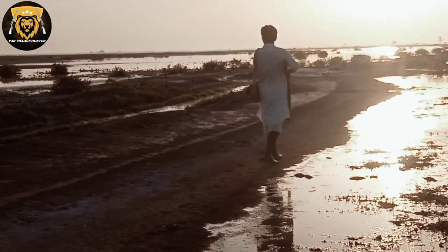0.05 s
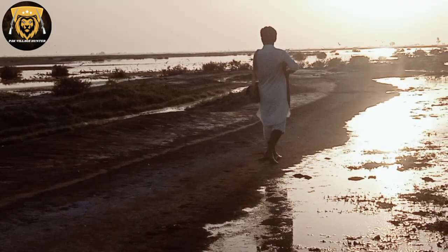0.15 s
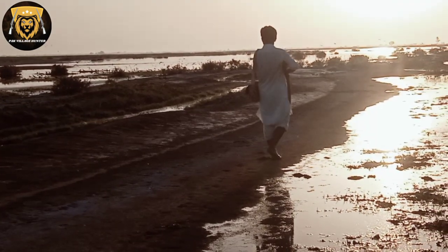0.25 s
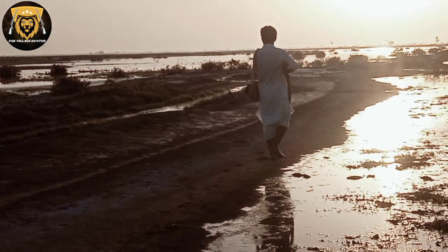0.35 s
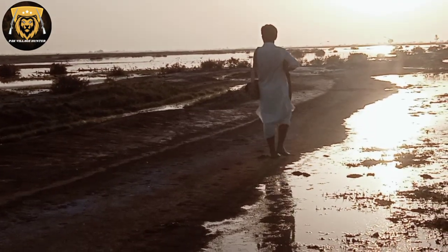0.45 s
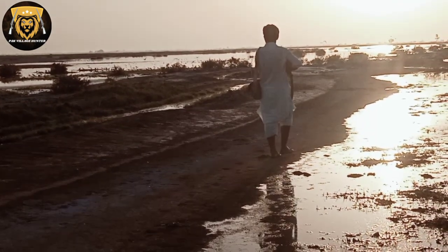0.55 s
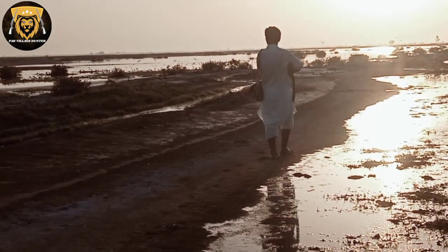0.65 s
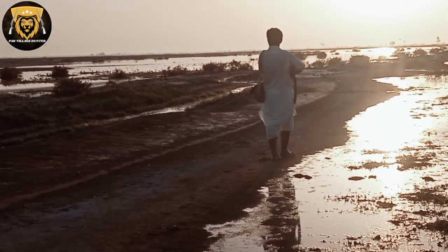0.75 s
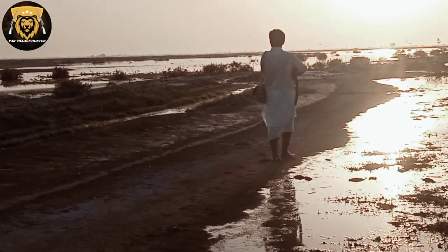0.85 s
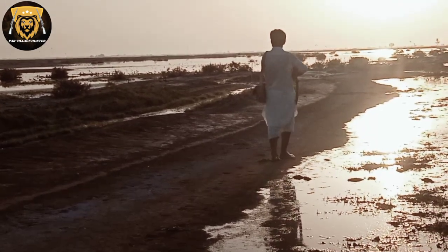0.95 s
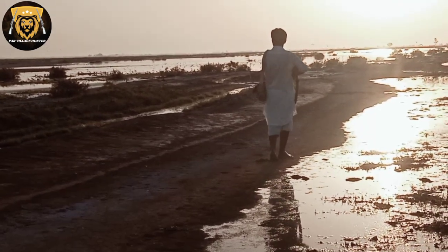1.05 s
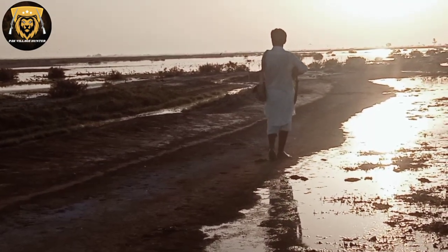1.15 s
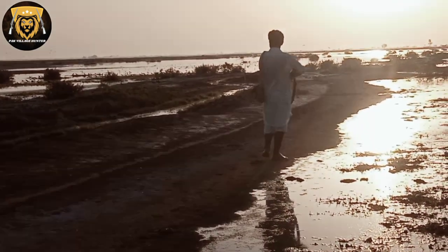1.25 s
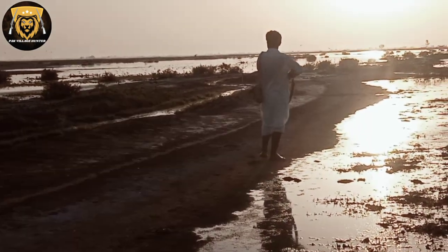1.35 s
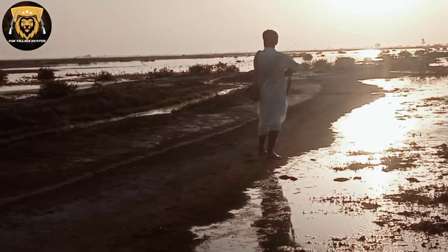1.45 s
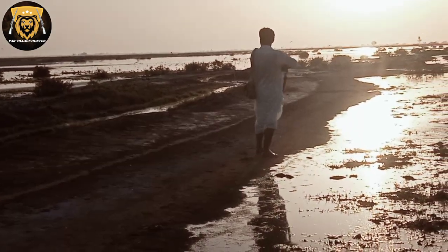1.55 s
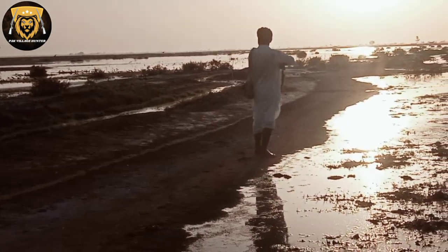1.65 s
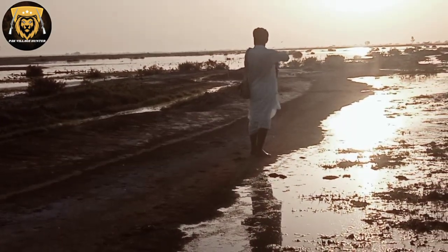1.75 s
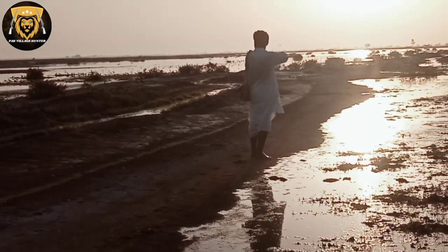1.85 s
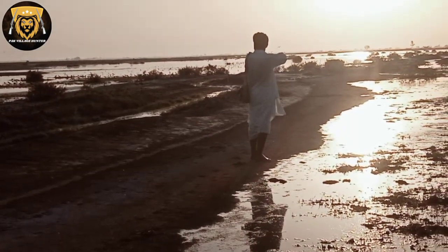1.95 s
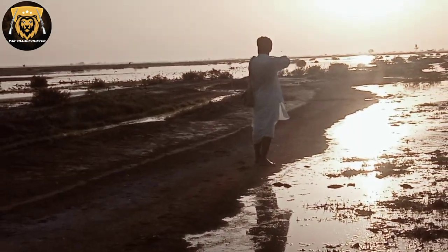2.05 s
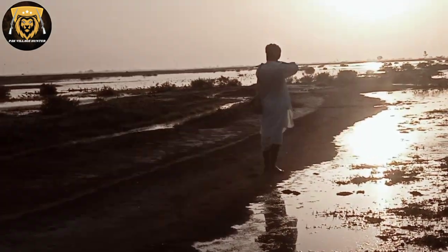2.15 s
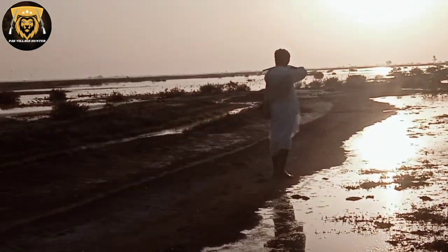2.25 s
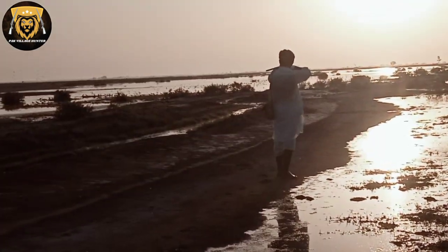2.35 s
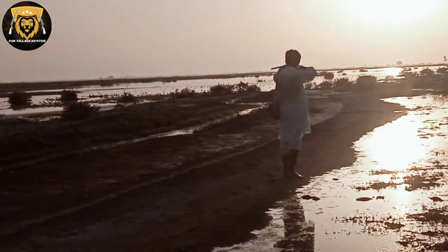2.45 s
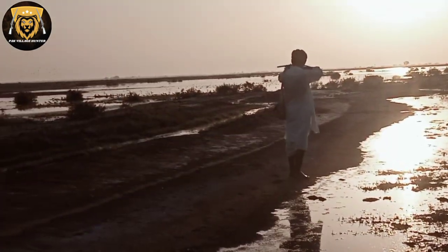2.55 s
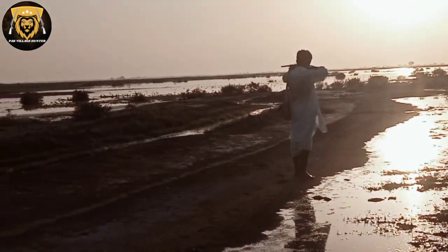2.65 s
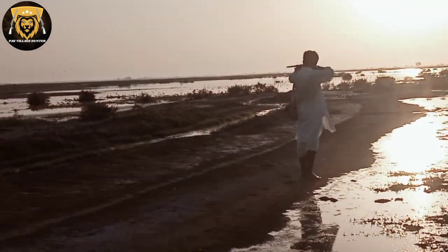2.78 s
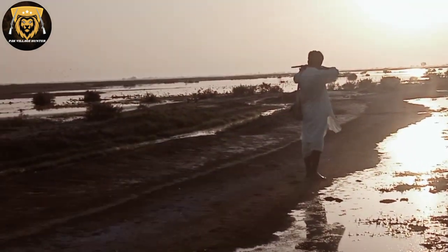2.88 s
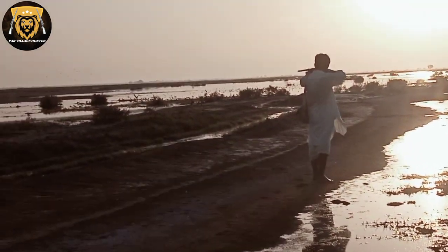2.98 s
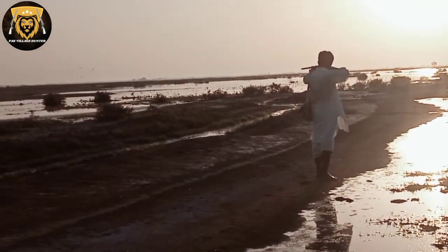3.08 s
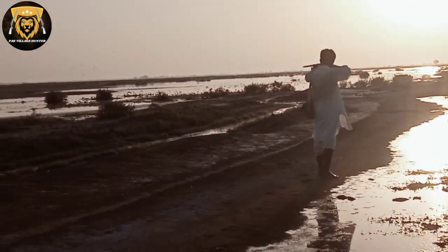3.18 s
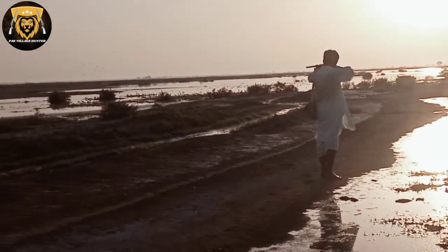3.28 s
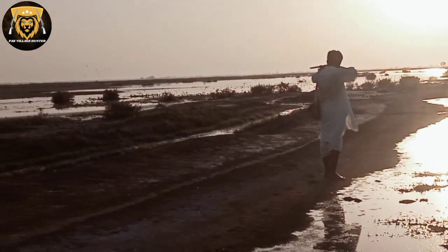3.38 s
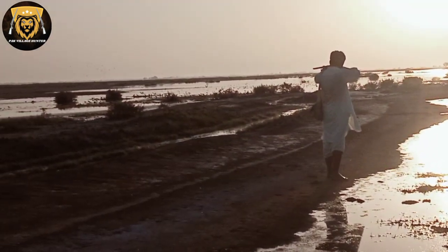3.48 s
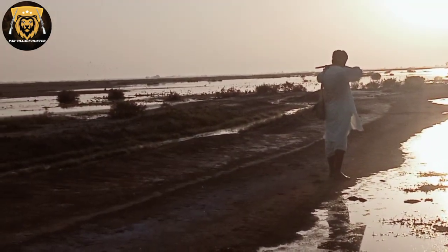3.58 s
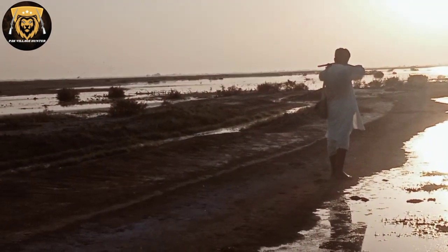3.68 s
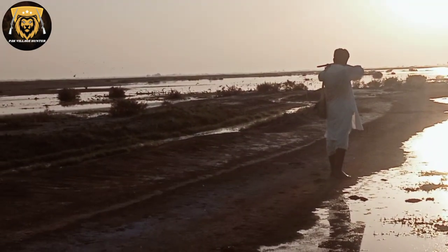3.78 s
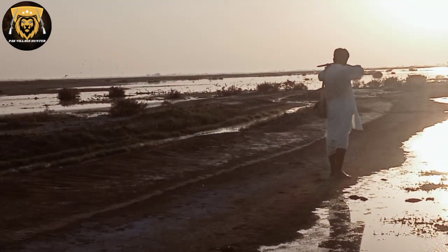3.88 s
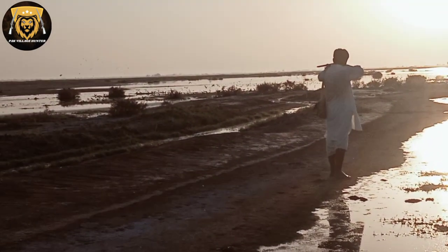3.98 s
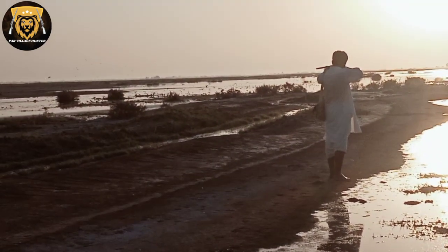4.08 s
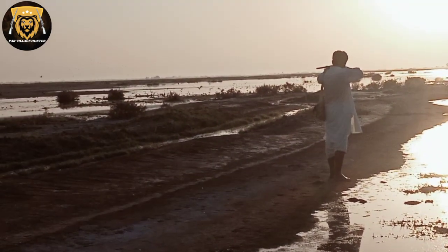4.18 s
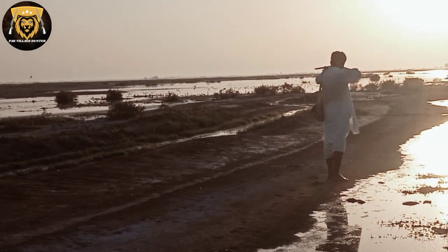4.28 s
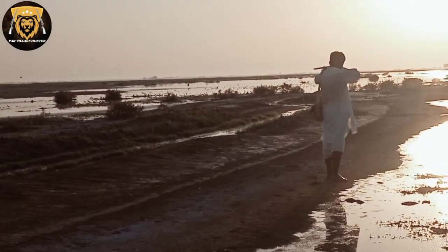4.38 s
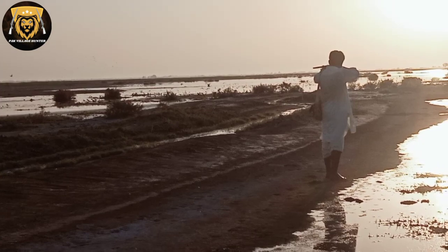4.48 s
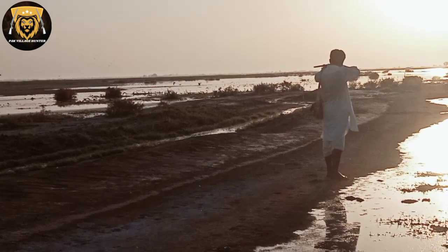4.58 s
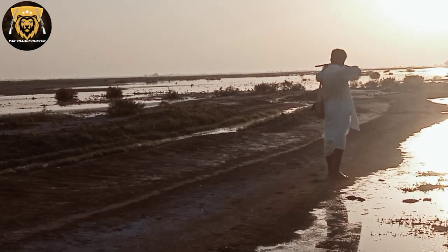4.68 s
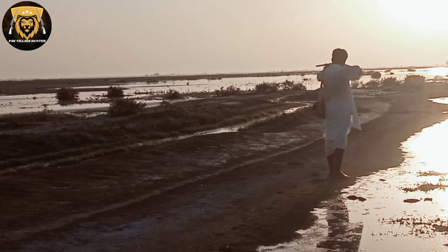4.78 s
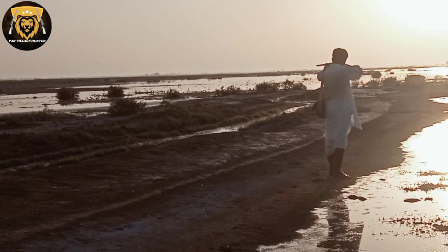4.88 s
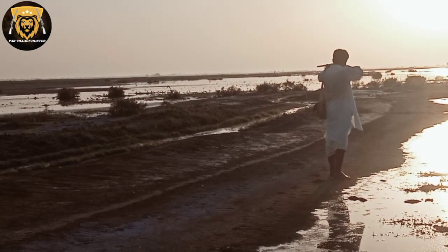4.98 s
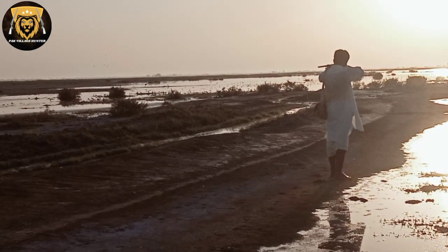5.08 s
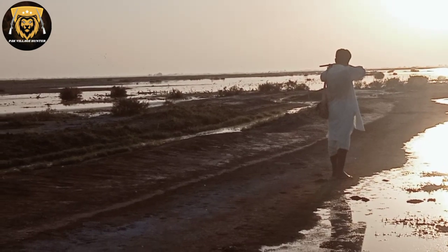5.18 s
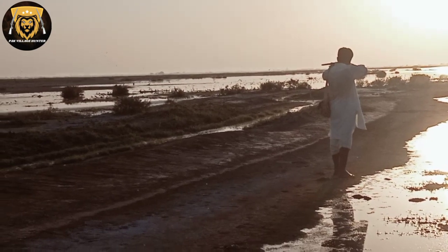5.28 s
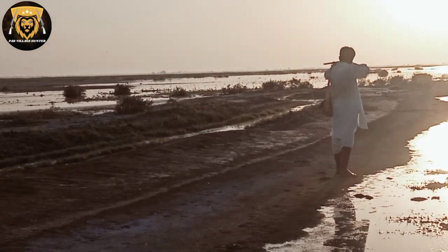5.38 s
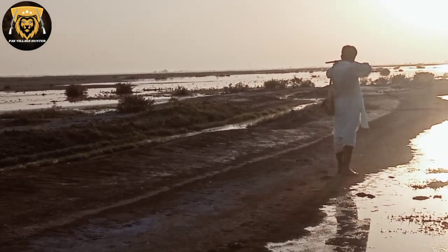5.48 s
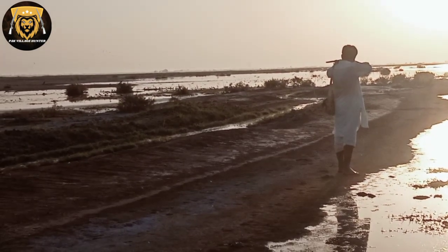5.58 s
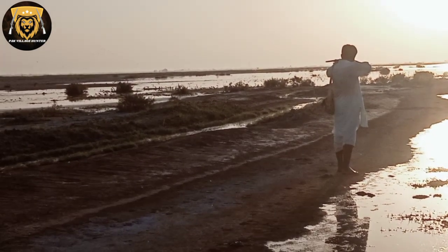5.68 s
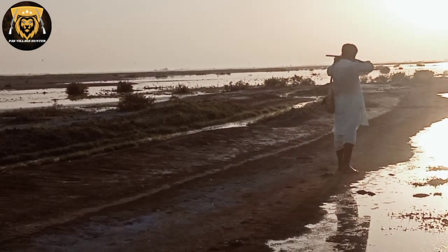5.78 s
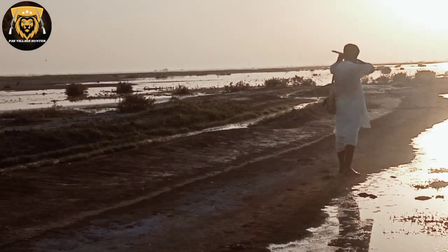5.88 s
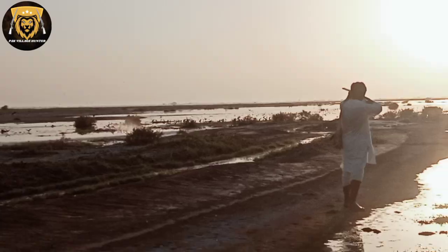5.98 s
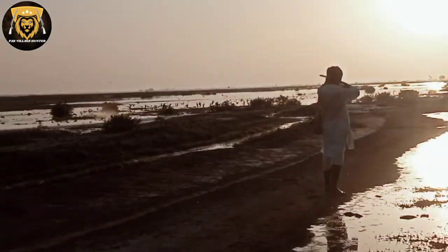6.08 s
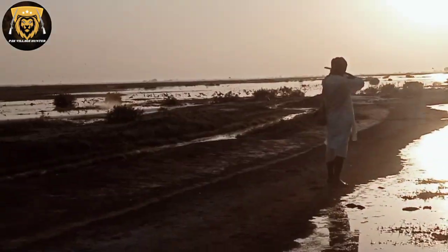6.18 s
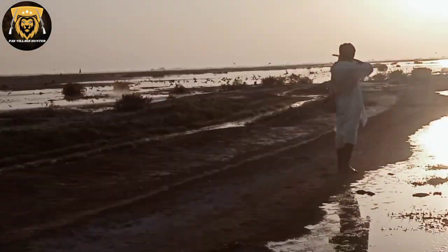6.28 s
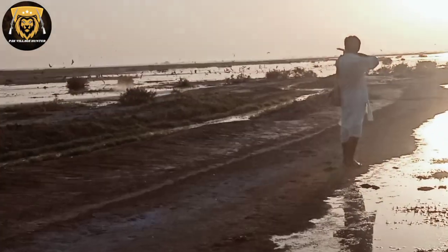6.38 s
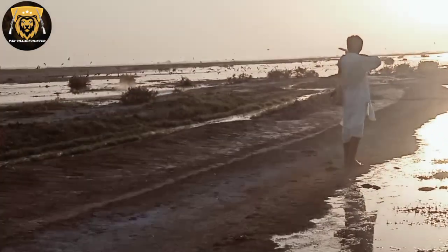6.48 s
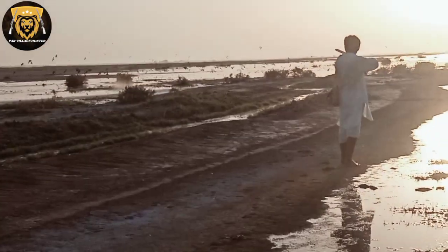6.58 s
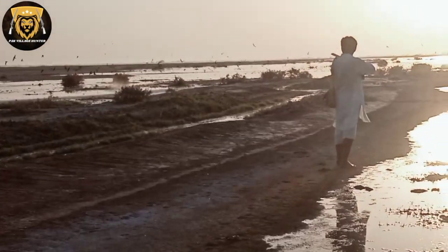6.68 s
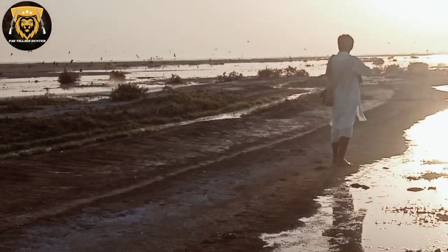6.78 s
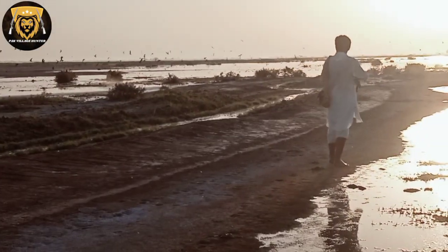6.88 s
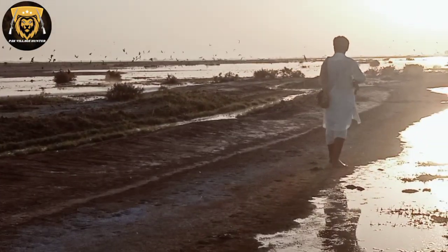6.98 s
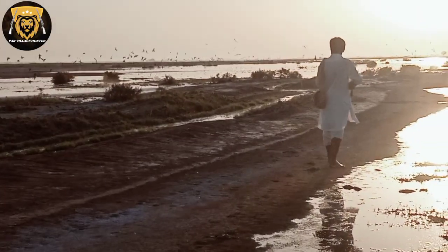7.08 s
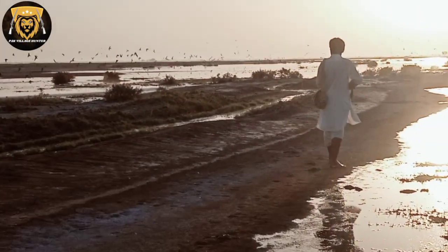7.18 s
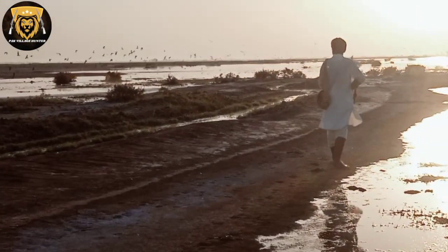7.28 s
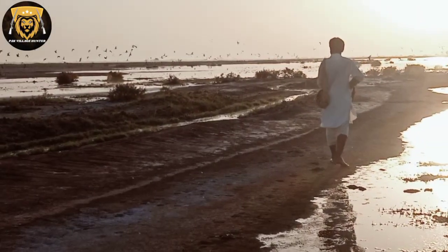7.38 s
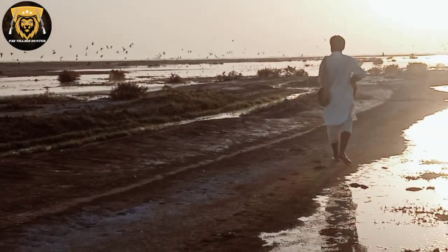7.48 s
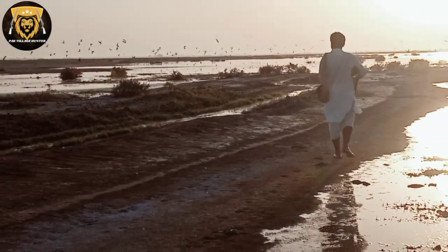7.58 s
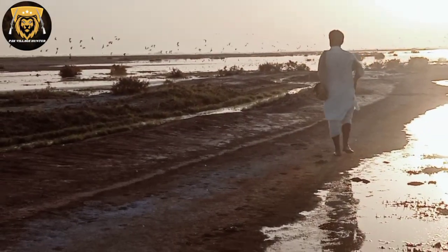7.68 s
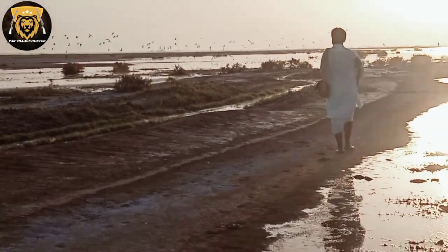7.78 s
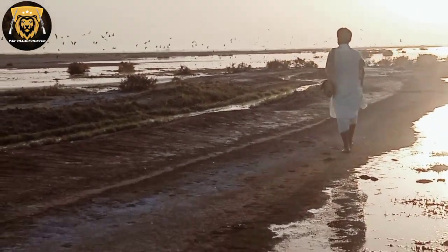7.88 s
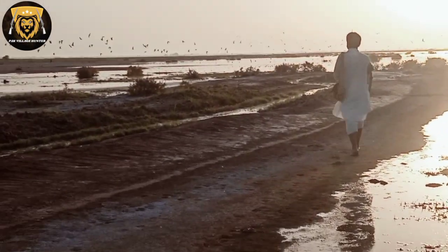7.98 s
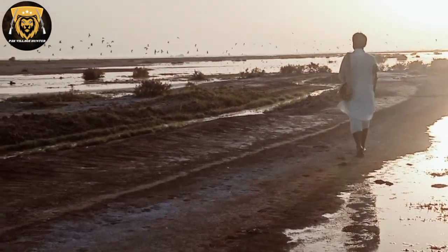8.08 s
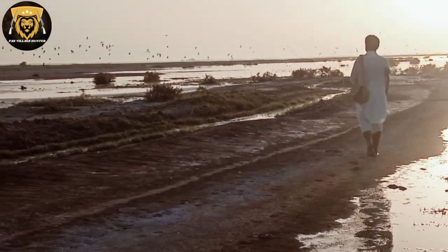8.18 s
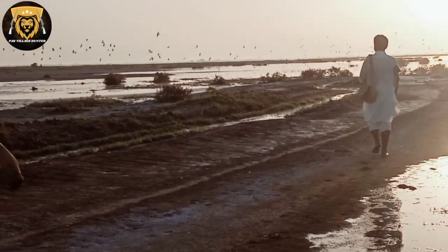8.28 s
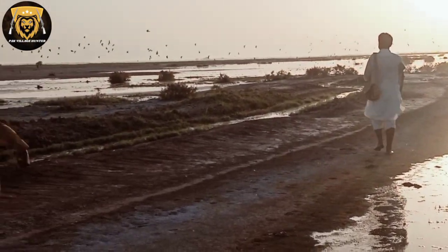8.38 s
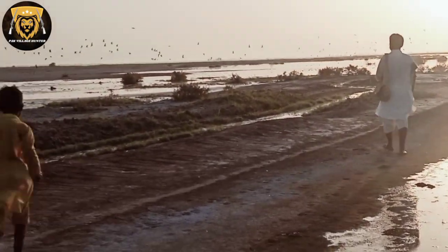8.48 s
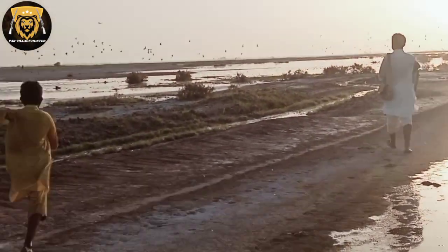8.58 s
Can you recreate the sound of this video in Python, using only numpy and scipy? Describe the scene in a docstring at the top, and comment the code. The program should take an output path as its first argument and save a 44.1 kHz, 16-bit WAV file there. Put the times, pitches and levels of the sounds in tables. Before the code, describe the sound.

From 0 s, an open marsh is heard outdoors: a dark, steady distant wash, lumpy low wind on the microphone with occasional soft bumps, and quiet wader calls, short arched peeps around 4 kHz, low chips and small yelps. A faint click comes at 0.4 s. A weak harsh rasp at 2.5 s and a barely audible breathy hoot at 2.9 s pass among the peeps. From about 4 to 5.2 s one near bird twitters eight times a second, with sliding whistles, as the far flock grows restless. At 5.8 s a close shotgun fires: a sharp, overloaded crack, low boom, quick echoes and a crackling roll, dulling by 6.4 s. From 6.3 s the flock rallies into a dense, much louder clamour of peeps, falling squeals and hoarse chirps, strongest around 7 to 7.5 s, then slightly receding. Gun and footstep clicks and fine grit continue from 6.6 s to the end at 8.6 s.

```python
"""A flock of waders peeps, whistles and squeals over an open marsh, as gliding tones with weak overtones;
light wind nudges the microphone, as lumpy low noise and damped bumps, over a steady distant wash.
A shotgun fires close by, a pulse and noise bursts that overload the recorder; banks and reeds scatter it back.
The flock takes off and calls louder, then draws away; small clicks, short noise bursts heard once before
the shot too, and fine grit sound as the shooter lowers the gun and walks on."""
import sys
import numpy as np
from scipy import signal
from scipy.fft import rfft, irfft
from scipy.io import wavfile
from scipy.ndimage import uniform_filter1d

SR = 44100
rng = np.random.default_rng(int(sys.argv[2]) if len(sys.argv) > 2 else 0)


def unload_wav(signal):
    """Save mono or channel-first audio to the path in sys.argv[1] as 16-bit WAV at rate SR, clipped to [-1, 1]."""
    wavfile.write(
        sys.argv[1],
        SR,
        np.round(np.clip(np.atleast_2d(signal).T, -1, 1) * 32767).astype(np.int16),
    )


N = 381024
TIME = np.arange(N) / SR
SHOT_S = 5.799


def amp(db):
    """Decibel law: 20 dB is a factor of ten in amplitude."""
    return 10 ** (np.asarray(db) / 20)


def unit(x):
    """Normalization to a root-mean-square value of 1."""
    return x / np.sqrt(np.mean(x ** 2) + 1e-20)


def read(points, hz):
    """Spectral interpolation: straight lines in dB on a logarithmic frequency axis."""
    point_hz, db = np.transpose(points)
    return np.interp(np.log(hz + 1), np.log(point_hz + 1), db)


def follow(rows, x, axis=1):
    """Linear interpolation of one column of a table against its first column."""
    return np.interp(x, np.array(rows)[:, 0], np.array(rows)[:, axis])


def add(mix, s, sound):
    """Superposition: sums a sound into the mix from time s, cut at the ends of the mix."""
    start = round(s * SR)
    sound = sound[max(-start, 0):]
    part = mix[max(start, 0):][:len(sound)]
    part += sound[:len(part)]


def noise(tone, size):
    """Spectral shaping: white noise weighted by a spectrum, at rms 1."""
    spectrum = rfft(rng.standard_normal(size))
    return unit(irfft(spectrum * amp(read(tone, np.fft.rfftfreq(size, 1 / SR))), size))


def wander(t, per_s):
    """Random modulation: normal values drawn per_s times a second, joined by straight lines."""
    u = (t - t[0]) * per_s
    knots = np.arange(int(u[-1]) + 2)
    return np.interp(u, knots, rng.standard_normal(len(knots)))


def band(x, lo_hz, hi_hz):
    """Band-pass filtering with a Butterworth response."""
    sos = signal.butter(2, [lo_hz, min(hi_hz, SR / 2 - 1)], "band", fs=SR, output="sos")
    return signal.sosfilt(sos, x)


def progress(length):
    """Normalized time, from 0 to 1 over a call of the given length in seconds."""
    return np.linspace(0, 1, round(max(length, .005) * SR))


# Spectrum of the distant wash: (frequency [Hz], relative level [dB])
WASH_SPECTRUM = [(25, -21), (129, -1.5), (240, -8), (297, -6.5), (400, -17.5), (850, -24), (2800, -25.5),
                 (4100, -24), (5000, -35), (8000, -34.5), (9800, -43.5), (15500, -43.5)]
WASH_DB = -64  # level of its 200 to 1600 Hz band before the shot
SWELL_DB, SWELL_S = 7, .5  # the wash rises after the shot


def air():
    """Broadband background noise: a distant wash, dark with a thin hiss on top."""
    wash = noise(WASH_SPECTRUM, N)
    wash = wash / np.std(band(wash, 199.4, 1600))
    rise_db = SWELL_DB * np.clip((TIME - SHOT_S) / SWELL_S, 0, 1)
    return wash * amp(WASH_DB + rise_db + .5 * wander(TIME, 26))


# Wind on the microphone, before rumble_db and the lumps: (time [s], level [dB])
WIND_LEVEL = [(0, -59), (.75, -53), (1.7, -58), (2.7, -52.5), (3.2, -60), (4.1, -53), (4.7, -61),
              (5.6, -64), (6.3, -61.5), (6.7, -50.5), (7.5, -54), (8.64, -54)]
# Wind spectrum: (frequency [Hz], relative level [dB])
WIND_SPECTRUM = [(20, -29.5), (45, -6.5), (75, 2), (130, 0.5), (200, -8.5), (320, -29.5), (800, -54),
                 (3000, -92)]
# Soft bumps, before bump_db: (time [s], envelope level [dB], pitch [Hz])
MIC_BUMPS = [(2.393, -30, 115), (3.411, -33.5, 160), (3.964, -36.5, 122), (4.242, -40, 90),
             (6.699, -31, 124), (6.74, -32, 105), (6.781, -24, 110), (7.07, -35.5, 159), (7.11, -29, 225.8),
             (7.764, -37.5, 166)]
BUMP_CYCLES = 0.4  # a bump dies by 1/e in this many cycles


def wind(rumble_db=-2.0, bump_db=3.5):
    """Amplitude-modulated low noise for the wind, with damped oscillations for the bumps."""
    lumps_db = 3.5 * wander(TIME, 16)
    out = noise(WIND_SPECTRUM, N) * amp(follow(WIND_LEVEL, TIME) + rumble_db + lumps_db)
    t = np.arange(-SR // 16, SR // 16) / SR
    for s, db, hz in MIC_BUMPS:
        envelope = np.exp(-abs(t) * hz / BUMP_CYCLES)
        wave = np.sin(2 * np.pi * (hz * t + rng.random()))
        add(out, s + t[0], amp(db + bump_db) * envelope * wave)
    return out


# Clicks of gun and footsteps, before knock_db and snap_db: (time [s], body level [dB], treble level [dB])
GUN_AND_STEP_CLICKS = [(0.411, -49, -69), (6.604, -39, -59), (6.725, -38, -72), (7.069, -36.5, -74),
                       (7.479, -38.5, -61), (7.952, -44, -61), (8.05, -42, -63), (8.241, -36.5, -61),
                       (8.336, -34, -61), (8.498, -40, -64.5), (8.516, -40, -64), (8.597, -31, -54)]
# Spectrum of a click's body: (frequency [Hz], relative level [dB])
KNOCK_SPECTRUM = [(100, -23), (400, 5.5), (900, -3.5), (1600, -2.5), (2800, -4.5), (4500, -7), (7000, -7.5),
                  (10000, -29), (15000, -38)]


def clicks(decay=0.0027, snap_decay=0.0027, knock_db=-1.5, snap_db=2.5, grit_db=-66, grit_per_s=45):
    """Impact excitation: decaying knocks with a bright snap, and random grains of grit after the shot."""
    out, t = np.zeros(N), np.arange(SR // 16) / SR
    for s, body_db, treble_db in GUN_AND_STEP_CLICKS:
        knock = amp(body_db + knock_db) * noise(KNOCK_SPECTRUM, len(t)) * np.exp(-t / decay)
        treble = unit(band(rng.standard_normal(len(t)), 5000, 16000))
        snap = amp(treble_db + snap_db) * treble * np.exp(-t / snap_decay)
        add(out, s, knock + snap)
    grains = (rng.random(N) < grit_per_s / SR) * rng.exponential(1, N) * (TIME > SHOT_S)
    # each grain dies by 1/e in 1.5 ms
    grain_level = signal.lfilter([1], [1, -np.exp(-1 / (.0015 * SR))], grains)
    crackle = grain_level * unit(band(rng.standard_normal(N), 900, 11000))
    return out + amp(grit_db) * crackle


TAPER = .2  # share of a call's length spent fading in and out


def syrinx(hz, second_db, third_db, flutter=0.39, waver=0.0054, drift=0.0124):
    """Harmonic synthesis: a bird tone on a pitch curve, two overtones, random pitch and level modulation."""
    t = np.arange(len(hz)) / SR
    unsteady_hz = hz * (1 + waver * wander(t, 160) + drift * wander(t, 66.1))
    phase = 2 * np.pi * np.cumsum(unsteady_hz) / SR
    octave = amp(second_db) * np.sin(2 * phase) * np.exp(0.2 * wander(t, 70))
    third = amp(third_db) * np.sin(3 * phase) * (3 * hz < SR / 2)
    shape = signal.windows.tukey(len(t), TAPER) * np.exp(flutter * wander(t, 130))
    return unit((np.sin(phase) + octave + third) * shape)


def peep(rise, fall, top_hz, second_db, dip=0, swell_db=4, purer_db=10):
    """Frequency glide: pitch climbs as the call swells, perhaps in two humps, then drops as the octave fades."""
    t = np.arange(-rise, 1.15 * fall, 1 / SR)
    before, after = np.maximum(-t / rise, 0), np.maximum(t / fall, 0)
    sag = .1 * before ** 1.6 + .27 * after ** 1.8
    sag = sag + dip * np.sin(2 * np.pi * before) * np.sin(np.pi * before)
    octave_db = second_db + swell_db * before - purer_db * after
    return unit(syrinx(top_hz * (1 - sag), octave_db, -42.0) * amp(-swell_db * before))


SQUEAL_S, SQUEAL_DROP = 0.078, .31  # length of a near squeal; share of the pitch that any squeal loses


def squeal(length, first_hz, trill_hz, rate_hz=150, swell_db=7):
    """Frequency modulation: a high note sags, then plunges, under a fast, uneven trill that makes it raspy."""
    u = progress(length)
    t = np.arange(len(u)) / SR
    hz = first_hz * (1 - SQUEAL_DROP * (u + u ** 4) / 2)
    trill = np.sin(2 * np.pi * rate_hz * t + 2.2 * wander(t, 83.4)) + .5 * wander(t, 945)
    return unit(syrinx(hz + trill_hz * trill, -36, -50, flutter=0.32) * amp(swell_db * np.sin(np.pi * u)))


def hoarse(call, per_s=420):
    """Amplitude modulation: an alarmed voice breaks up into a fast, uneven flutter."""
    return unit(call * np.exp(.5 * wander(np.arange(len(call)) / SR, per_s)))


# Far flock, growing restless before the shot: (time [s], level of the loudest peeps [dB], call rate [1/s])
FAR_CHATTER = [(0, -66, 8.34), (1.7, -64.5, 8.3), (2.8, -73, 5.5), (3.7, -59.5, 17.6), (5, -60.5, 23.7),
               (5.7, -64, 14)]
# silent for STARTLE_S after the shot, then the flock rallies to a din
STARTLE_S, RALLY_S, ALARM_DB, ALARM_PER_S = .51, .4, -47.5, 100
LEAVE_S, LEAVE_DB_PER_S = 7.2, 1.5  # once airborne, the flock draws away


def far_birds(spread_db=13):
    """Random superposition: many calls at a varying rate; after the shot some squeal or chirp hoarsely."""
    out = np.zeros(N)
    alarm = 1 - np.exp(-np.maximum(TIME - SHOT_S - STARTLE_S, 0) / RALLY_S)
    calm = (1 - alarm) * ((TIME < SHOT_S) | (alarm > 0))
    calls_per_s = calm * follow(FAR_CHATTER, TIME, axis=2) + alarm * ALARM_PER_S
    calls = np.cumsum(calls_per_s) / SR
    alarm_db = ALARM_DB - LEAVE_DB_PER_S * np.maximum(TIME - LEAVE_S, 0)
    level_db = (1 - alarm) * follow(FAR_CHATTER, TIME) + alarm * alarm_db
    for k, (when, kind, long, high, loud) in enumerate(rng.random((int(calls[-1]), 5))):
        s = np.interp(k + when, calls, TIME)
        # low chirps take over as the flock gets airborne
        chirp_share = np.interp(s, [7, 7.7], [.24, .66])
        if s > SHOT_S and kind < .16:
            call = amp(-8.0) * squeal(0.037 + 0.039 * long, 6100 + 2000 * high, 70)
        elif s > SHOT_S and kind < chirp_share:
            chirp = peep(0.00604 + 0.018 * long, 0.02 + 0.036 * long, 2900 + 1000 * high, -9.5)
            call = amp(-4.0) * hoarse(chirp)
        else:
            octave_db = -19.5 if s > SHOT_S else -14.5
            call = peep(0.023 + 0.046 * long, 0.016 + 0.016 * long, 3920 + 740 * high, octave_db)
        call_db = np.interp(s, TIME, level_db) + spread_db * (loud - 1)
        add(out, s - .015, amp(call_db) * call)
    return out


HOOT_S, HOOT_LENGTH_S, HOOT_HZ, HOOT_DB = 2.86, 0.19, 1800, -71.5


def hoot(width_hz=130):
    """Narrow-band noise: a faint, breathy note from far away."""
    u = progress(HOOT_LENGTH_S)
    breath = band(rng.standard_normal(len(u)), HOOT_HZ - width_hz, HOOT_HZ + width_hz)
    out = np.zeros(N)
    add(out, HOOT_S, amp(HOOT_DB) * unit(breath * np.sin(np.pi * u)))
    return out


# Resonances of the harsh call: (frequency [Hz], relative level [dB])
THROAT_RESONANCES = [(1500, -40), (2600, -11), (2950, -5), (3300, -9), (4200, -3), (4900, -10), (5700, -10),
                     (6500, -25), (10000, -40)]
RASP_S, RASP_LENGTH_S, RASP_DB, RASP_EDGE_DB = 2.48, 0.3, -64, -11


def rasp():
    """Resonance: fluttering noise shaped by a bird's throat swells and fades in an arch."""
    u = 2 * (TIME - RASP_S) / RASP_LENGTH_S - 1
    level_db = RASP_DB + RASP_EDGE_DB * np.minimum(u ** 2, 1) + 3.4 * wander(TIME, 150)
    return noise(THROAT_RESONANCES, N) * amp(level_db) * (abs(u) < 1)


def whistle(hz):
    """Harmonic synthesis: a smooth, low tone on a pitch curve, with a clear octave."""
    return syrinx(hz, -19.5, -29.5, flutter=0.14, waver=0.003, drift=0.002)


# Short, low chips: (time [s], top pitch [Hz], level [dB])
LOW_CHIPS = [(0.201, 2960, -62), (0.598, 3010, -64), (0.926, 2980, -56), (1.631, 3670, -58.5),
             (1.686, 3010, -62.5), (1.748, 3310, -58), (3.378, 3060, -63), (3.54, 2970, -61.4),
             (4.443, 2960, -56.5), (4.527, 3100, -57.5), (4.85, 3050, -57.5), (4.957, 2970, -57.5),
             (5.719, 3500, -60.5), (5.764, 2900, -54.5), (6.969, 3180, -51), (7.283, 3110, -42.5),
             (7.479, 3100, -44.5), (7.935, 3473, -50), (7.973, 2800, -53.5), (8.143, 3330, -46.5),
             (8.186, 3440, -49.5), (8.346, 2870, -50), (8.607, 3070, -46)]
CHIP_S, CHIP_DROP = .034, 0.31
# Long whistles: (time [s], length [s], first pitch [Hz], level [dB])
SLIDING_WHISTLES = [(1.513, 0.07, 3410, -68), (3.88, 0.086, 2640, -60), (4.034, 0.066, 2740, -57.1),
                    (4.097, 0.06, 2530, -60.5), (4.231, 0.059, 2740, -63), (4.292, 0.054, 2460, -64.5),
                    (5.117, 0.053, 2700, -62.5), (5.248, 0.068, 2810, -60), (5.305, 0.097, 2480, -64),
                    (5.497, 0.06, 2740, -65), (5.568, 0.1, 2410, -70.5), (7.167, 0.075, 2650, -59.5),
                    (7.31, 0.17, 2640, -58), (7.546, 0.14, 2740, -57.5), (7.626, 0.082, 3240, -55),
                    (7.785, 0.059, 2730, -56.5)]
WHISTLE_DROP = .19


def low_calls():
    """Frequency glides: chips bend over and drop, whistles slide and level off; both hoarse after the shot."""
    calls = []
    for s, hz, db in LOW_CHIPS:
        calls.append((s, db, hz * (1 - CHIP_DROP * (progress(CHIP_S) - .25) ** 2)))
    for s, length, hz, db in SLIDING_WHISTLES:
        slide = np.sin(np.pi / 2 * progress(length)) ** 2
        calls.append((s, db, hz * (1 - WHISTLE_DROP * slide)))
    out = np.zeros(N)
    for s, db, pitch in calls:
        call = whistle(pitch)
        add(out, s, amp(db) * (hoarse(call) if s > SHOT_S else call))
    return out


# High falling squeals, before squeal_db: (time [s], first pitch [Hz], level [dB])
FALLING_SQUEALS = [(0.482, 6860, -79), (0.974, 6200, -72.5), (6.347, 7400, -62.5), (6.485, 7180, -51.5),
                   (6.566, 6720, -58.5), (6.763, 7200, -53.5), (6.935, 7000, -46), (7.014, 7160, -54),
                   (7.159, 7180, -55.5), (7.493, 7320, -44), (7.669, 6800, -58.5), (7.755, 7300, -59.9),
                   (7.83, 7100, -61.1), (7.951, 6730, -61), (8.339, 7160, -56), (8.432, 7100, -57.5)]
# The harder a squeal is pushed, the cleaner it is: (level before squeal_db [dB], trill depth [Hz])
TRILL_DEPTH = [(-61, 500), (-45, 90)]
# Quick upward squeaks: (time [s], level [dB])
RISING_SQUEAKS = [(6.71, -51.5), (6.88, -51), (6.897, -46.5), (7.46, -43)]
SQUEAK_S, SQUEAK_FROM_HZ, SQUEAK_TO_HZ = 0.0118, 5800, 8000


def high_calls(squeal_db=2):
    """Frequency glides in opposite directions: falling squeals and quick upward squeaks."""
    out = np.zeros(N)
    for s, first_hz, db in FALLING_SQUEALS:
        call = squeal(SQUEAL_S, first_hz, follow(TRILL_DEPTH, db))
        add(out, s, amp(db + squeal_db) * call)
    rising_hz = SQUEAK_FROM_HZ + (SQUEAK_TO_HZ - SQUEAK_FROM_HZ) * progress(SQUEAK_S) ** 1.45
    for s, db in RISING_SQUEAKS:
        add(out, s, amp(db) * syrinx(rising_hz, -32.0, -52, flutter=0.61))
    return out


def yelp(rise, hold, high_hz):
    """Register break: a rising tone snaps up by about a third, holds, and snaps down to a short, lower tail."""
    t = np.arange(-rise, hold, 1 / SR)
    u = t / hold
    low, high, tail = .82 + .08 * t / rise, 1 - .2 * (u - .25) ** 2, .82 - .24 * u
    ratio = np.select([t < 0, u < .75], [low, high], tail)
    swell = np.interp(t, [-rise, -rise / 2], [.3, 1])
    return unit(swell * syrinx(high_hz * uniform_filter1d(ratio, size=40), -22.5, -40))


# Arched peeps: (time of the top [s], rise [s], top pitch [Hz], level [dB])
ARCHED_PEEPS = [(0.073, 0.04, 4470, -63), (0.2, 0.065, 4240, -63.6), (0.251, 0.027, 4590, -64),
                (0.362, 0.053, 4120, -64), (0.492, 0.019, 4530, -57.5), (0.549, 0.016, 4700, -64),
                (0.677, 0.049, 4220, -58), (0.815, 0.021, 4620, -63), (0.92, 0.029, 4120, -64),
                (1.073, 0.025, 4020, -64.5), (1.222, 0.025, 3900, -67.5), (1.353, 0.022, 4300, -65),
                (1.484, 0.02, 4650, -59.5), (1.595, 0.032, 4300, -60), (1.709, 0.021, 4350, -65.5),
                (1.804, 0.032, 4520, -58.5), (1.955, 0.05, 4220, -68), (2.284, 0.031, 4380, -60.5),
                (2.334, 0.037, 3910, -61), (2.395, 0.037, 4060, -58), (2.456, 0.065, 4310, -58),
                (2.495, 0.022, 4070, -63.5), (3.011, 0.021, 4390, -60), (3.085, 0.019, 4200, -58),
                (3.122, 0.028, 4160, -63.5), (3.269, 0.027, 4540, -55.5), (3.42, 0.049, 4580, -52.7),
                (3.558, 0.044, 4370, -56.5), (3.673, 0.024, 4160, -60.5), (3.717, 0.027, 4360, -57),
                (3.809, 0.032, 4280, -57), (5.302, 0.022, 4200, -59.2), (5.457, 0.04, 4410, -64),
                (5.719, 0.037, 4290, -66), (6.441, 0.023, 4520, -63), (6.581, 0.039, 4620, -53.5),
                (6.645, 0.036, 4440, -57), (6.695, 0.06, 4270, -54.5), (6.827, 0.06, 4330, -49),
                (6.973, 0.026, 4380, -46.5), (7.112, 0.073, 4380, -49.5), (7.181, 0.051, 4200, -47),
                (7.225, 0.053, 4120, -49), (7.341, 0.037, 4180, -43.5), (7.501, 0.05, 4350, -46.5),
                (7.628, 0.044, 4100, -53), (7.688, 0.022, 4384, -48), (7.946, 0.042, 4260, -48.9),
                (8.128, 0.065, 4220, -50.5), (8.233, 0.074, 4660, -52), (8.322, 0.046, 4190, -49),
                (8.334, 0.063, 4460, -61)]
PEEP_FALL_S = 0.025
# Louder peeps are purer: (call level [dB], octave level [dB]); its rows are not in order of level,
# so the lookup makes a step: -16.5 dB for calls above -63 dB, -14 dB for the rest
PEEP_OCTAVE = [(-58.5, -14), (-65, -22), (-63, -16.5)]
# One near bird repeats a two-humped peep, about eight a second: (time of the top [s], top pitch [Hz])
TWITTER_PEEPS = [(3.97, 4470), (4.126, 4490), (4.303, 4600), (4.407, 4610), (4.52, 4516), (4.616, 4520),
                 (4.726, 4520), (4.869, 4370), (4.994, 4440), (5.109, 4370), (5.229, 4260)]
TWITTER_DB, TWITTER_RISE_S, TWITTER_FALL_S, TWITTER_DIP = -54, .04, .022, .032
# Calls that break upward: (time of the break [s], length after it [s], high pitch [Hz], level [dB])
BREAKING_YELPS = [(2.02, 0.045, 5230, -70), (2.182, 0.016, 5020, -59), (2.627, 0.032, 4920, -61.5),
                  (2.773, 0.029, 5160, -55.5), (2.922, 0.021, 5140, -55), (3.409, 0.018, 5570, -56),
                  (3.562, .013, 5400, -66), (5.536, 0.06, 5580, -65.5)]
YELP_RISE_S = .032


def near_peeps():
    """Superposition of the gliding peeps, twitters and yelps that stand out from the flock."""
    out = np.zeros(N)
    for s, rise, top_hz, db in ARCHED_PEEPS:
        second_db = follow(PEEP_OCTAVE, db) + 2 * rng.standard_normal()
        add(out, s - rise, amp(db) * peep(rise, PEEP_FALL_S, top_hz, second_db))
    for s, top_hz in TWITTER_PEEPS:
        second_db = follow(PEEP_OCTAVE, TWITTER_DB)
        call = peep(TWITTER_RISE_S, TWITTER_FALL_S, top_hz, second_db, TWITTER_DIP)
        add(out, s - TWITTER_RISE_S, amp(TWITTER_DB) * call)
    for s, hold, high_hz, db in BREAKING_YELPS:
        add(out, s - YELP_RISE_S, amp(db) * yelp(YELP_RISE_S, hold, high_hz))
    return out


def near_birds():
    """Superposition of all the calls that stand out from the flock."""
    return near_peeps() + low_calls() + high_calls() + rasp() + hoot()


NEAR_T60, FAR_T60 = .18, .38  # time for the tail of a near or far call to fall by 60 dB [s]


def marsh(x, wet_db, t60):
    """Reverberation: convolution with decaying noise for the faint, short tail from water and reeds."""
    t = np.arange(SR // 2) / SR
    tail = rng.standard_normal(len(t)) * amp(-60 * t / t60) * (t > .004)
    return x + amp(wet_db) * signal.fftconvolve(x, tail / np.linalg.norm(tail))[:N]


# Lone late crackles in the roll of the shot: (time [s], level before decay [dB])
LONE_CRACKLES = [(6.166, -47), (6.179, -46), (6.198, -52), (6.225, -44.5), (6.4, -56), (6.414, -50),
                 (6.437, -49)]
SPATTER_DB, SPATTER_DB_PER_S = -43, 45
SPATTER_END_S, SPATTER_END_DB_PER_S = 0.34, 200  # the extra, faster decay
FLARE_DB, FLARE_DELAY_S, FLARE_WIDTH_S = -42, 0.2, 0.0074  # flare with the echo off the bank


def spatter(per_s=1300, spread_db=5.0):
    """Random impulse train: tiny ticks of very unequal size die away after the shot; a few stand alone."""
    ticks = (rng.random(N) < per_s / SR) * amp(spread_db * np.minimum(rng.exponential(1, N), 4))
    t, age = np.arange(1000) / SR, np.maximum(TIME - SHOT_S, 0)
    # each tick dies by 1/e in 0.4 ms
    spray = signal.lfilter([1], [1, -np.exp(-1 / (.0004 * SR))], ticks) * rng.standard_normal(N)
    late_fall_db = SPATTER_END_DB_PER_S * np.maximum(age - SPATTER_END_S, 0)
    level = amp(SPATTER_DB - SPATTER_DB_PER_S * age - late_fall_db)
    level = level + amp(FLARE_DB) * np.exp(-((age - FLARE_DELAY_S) / FLARE_WIDTH_S) ** 2)
    out = unit(band(spray, 3500, 15000)) * level * (age > 0)
    for s, db in LONE_CRACKLES:
        crackle = unit(band(rng.standard_normal(len(t)), 2800, 14000)) * np.exp(-t / 0.00099)
        add(out, s, amp(db) * crackle)
    return out


# sound scattered by the marsh thins slowly out to the far bank, then quickly; a faint rumble lingers
SCATTER_DB, NEAR_DB_PER_S, BANK_S, FAR_DB_PER_S = -27.5, 18.5, 0.23, 50
LINGER_DB = -57.5


def scatter_db(t):
    """Energy addition: two-slope decay plus a constant remnant, t seconds after the shot."""
    near_db = NEAR_DB_PER_S * np.minimum(t, BANK_S)
    far_db = FAR_DB_PER_S * np.maximum(t - BANK_S, 0)
    return 10 * np.log10(amp(SCATTER_DB - near_db - far_db) ** 2 + amp(LINGER_DB) ** 2)


# Spectrum of the roll at its source: (frequency [Hz], relative level [dB])
ROLL_SPECTRUM = [(24, -62.5), (40, -31), (130, -9.5), (185, -2), (686, -0.5), (881, -4.5), (1130, -1),
                 (1310, -5.5), (3140, -4.5), (4920, -13.5), (7160, -11.5), (10100, -26.5), (15500, -28)]


def roll(t, dulling_db, knee_hz, grain_db, lumps_db):
    """Diffuse scattering: decaying noise with random spectral lumps and treble loss that grows with travel."""
    scattered = noise(ROLL_SPECTRUM, len(t)) * amp(scatter_db(t) + grain_db * wander(t, 220))
    hz, age, z = signal.stft(scattered, SR, nperseg=512)
    # each clump of reeds colours its own echo
    lumps = uniform_filter1d(rng.standard_normal(z.shape), size=7, axis=0)
    lumps = unit(uniform_filter1d(lumps, size=3, axis=1))
    # late echoes have travelled far and lost their treble
    octaves = np.log2(1 + (hz[:, None] / knee_hz) ** 2) / 2
    loss_db = dulling_db * np.maximum(age - .22, 0) * octaves
    z = z * amp(lumps_db * lumps - loss_db)
    return signal.istft(z, SR, nperseg=512)[1][:len(t)]


# Blast and its echoes off ground and banks: (delay [s], level before softening [dB], time to fall by 1/e [s])
BLAST_ECHOES = [(0, 3, 0.0075), (.008, -14, 0.025), (.022, -8.5, 0.014), (.042, -10, 0.019),
                (0.061, -11.5, .006), (.226, -24, 0.024), (0.366, -37.5, 0.0078)]
# Spectrum of the blast: (frequency [Hz], relative level [dB])
BLAST_SPECTRUM = [(24, -49), (40, -24), (253, -3.5), (368, -6), (562, -8), (903, -11), (1210, -2),
                  (1650, -7.5), (1950, -3), (2270, -14.5), (2510, -2.5), (3060, -8), (3560, -3.5),
                  (4570, -14.5), (7160, -13), (10100, -20.5), (15500, -17.5)]


def blast(t):
    """Pressure pulse and discrete reflections: a sharp pulse, and noise whose echo powers add."""
    power = 0
    for delay, db, decay in BLAST_ECHOES:
        fade_s = np.where(t < delay, .001, decay)
        power = power + amp(db) ** 2 * np.exp(-2 * abs(t - delay) / fade_s)
    push, push_s = 1.2, .00095
    pulse = push * (1 - t / push_s) * np.exp(-t / push_s)
    burst = np.sqrt(power) * noise(BLAST_SPECTRUM, len(t)) - pulse
    # echoes off the nearby mud soften quickly; the distinct late ones stay crisp
    soft = signal.sosfilt(signal.butter(1, 3200, fs=SR, output="sos"), burst)
    sharp = np.where(t < .2, np.exp(-t / 0.041), 1)
    return sharp * burst + (1 - sharp) * amp(2.0) * soft


def boom(t, boom_db=-24, boom_s=.02):
    """Exponential decay of a low noise band beneath the blast."""
    return amp(boom_db) * unit(band(rng.standard_normal(len(t)), 35, 260)) * np.exp(-t / boom_s)


def shot(dulling_db=11, knee_hz=900, grain_db=2, lumps_db=2):
    """Superposition of direct blast with close echoes, low boom, and a long roll that dulls with distance."""
    t = np.arange(2 * SR) / SR
    out = np.zeros(N)
    add(out, SHOT_S, blast(t) + boom(t) + roll(t, dulling_db, knee_hz, grain_db, lumps_db))
    return out


def scene():
    """Linear superposition of the reverberant birds, the shot, the wash, the wind and the clicks."""
    near = marsh(near_birds(), wet_db=-15.5, t60=NEAR_T60)
    far = marsh(far_birds(), wet_db=-9.5, t60=FAR_T60)
    return (near + far + shot() + spatter() + air() + wind() + clicks())[None]


EDGE_HZ = 15750  # upper band limit


def record(dry):
    """Nonlinear overload, then band limiting: peaks clip flat before a linear-phase low-pass filter."""
    clipped = np.clip(dry, -.93, .93)
    lowpass = signal.firwin(401, EDGE_HZ, window=("kaiser", 8), fs=SR)
    return signal.oaconvolve(clipped, lowpass[None], "same")


dry = scene()
out = record(dry)
unload_wav(out)
```